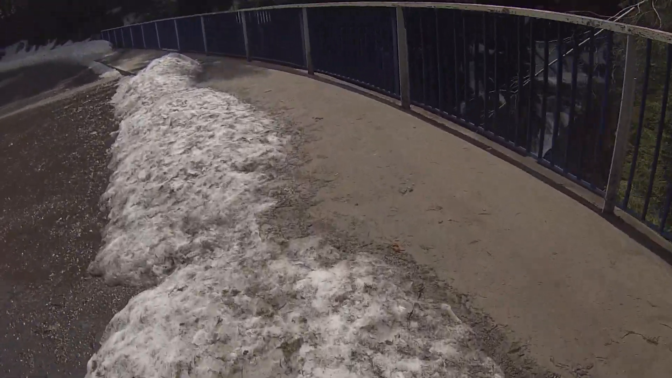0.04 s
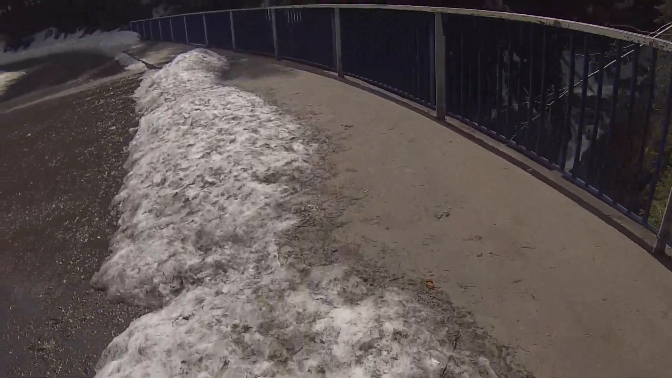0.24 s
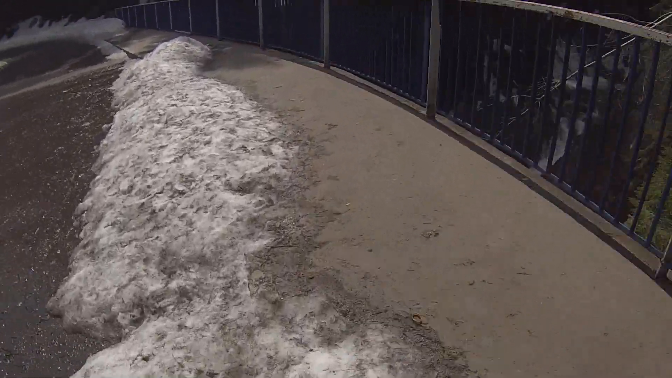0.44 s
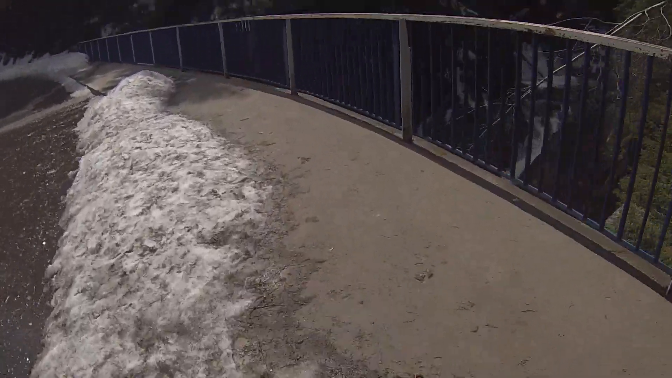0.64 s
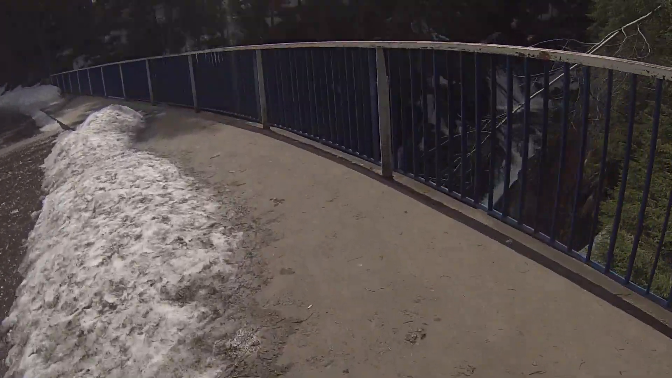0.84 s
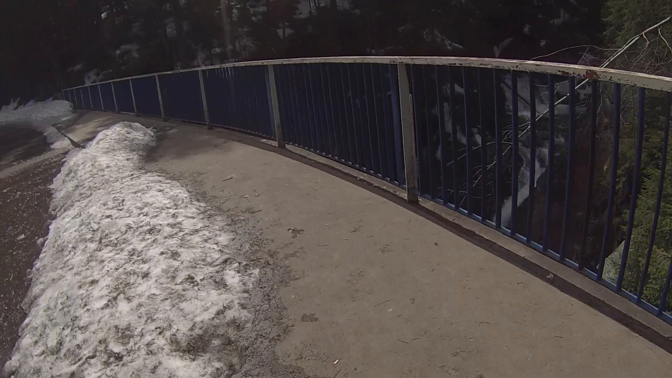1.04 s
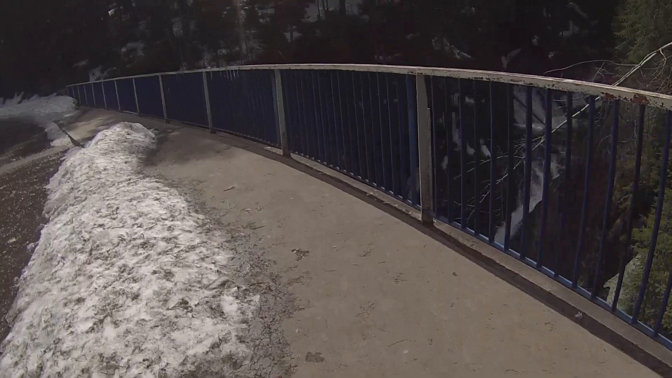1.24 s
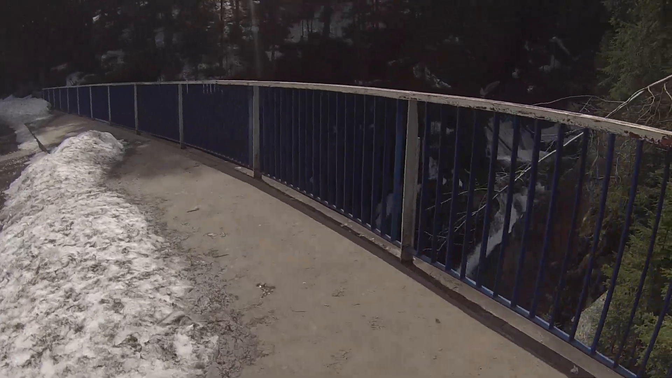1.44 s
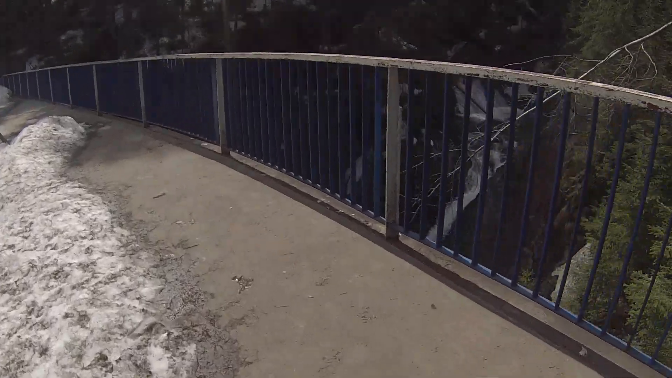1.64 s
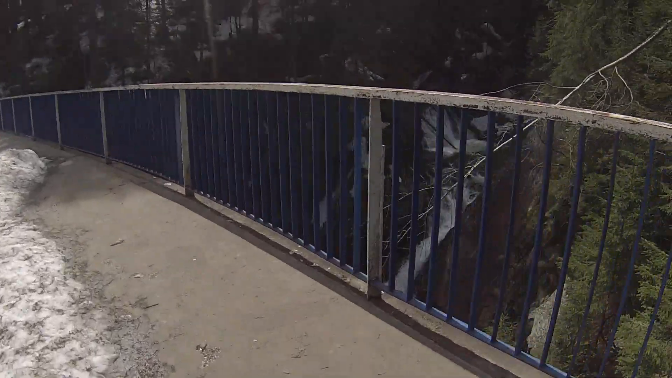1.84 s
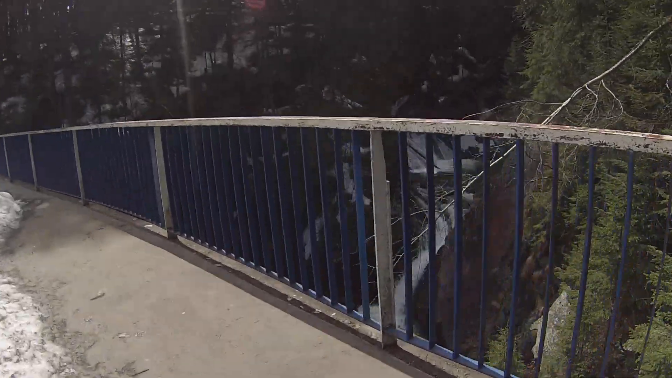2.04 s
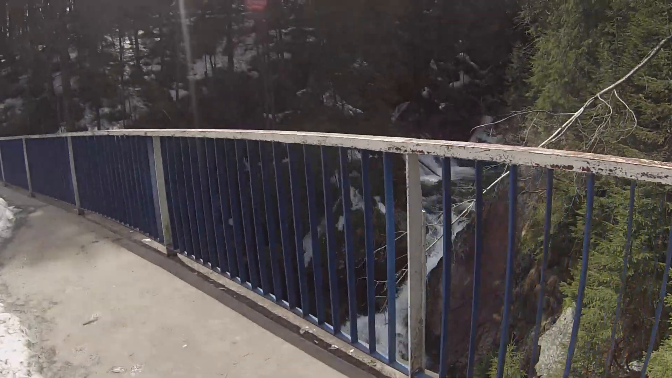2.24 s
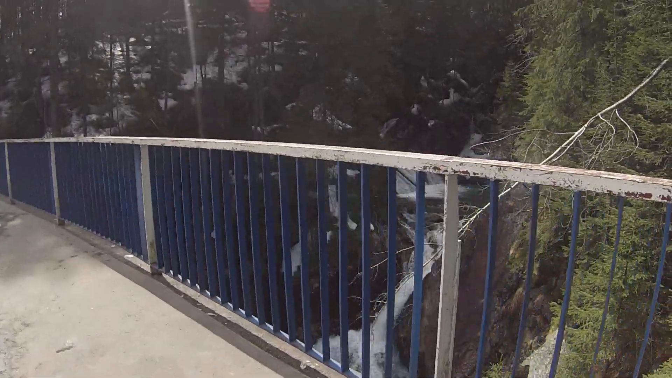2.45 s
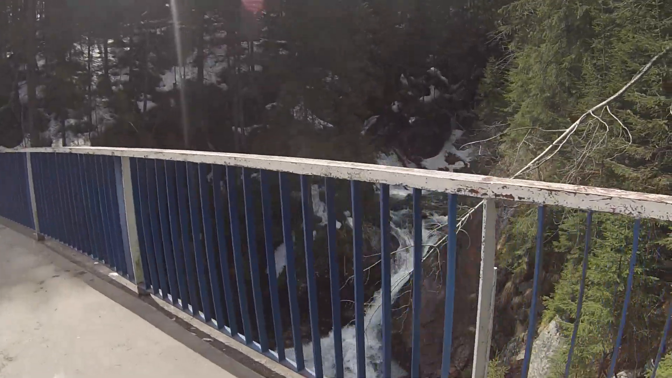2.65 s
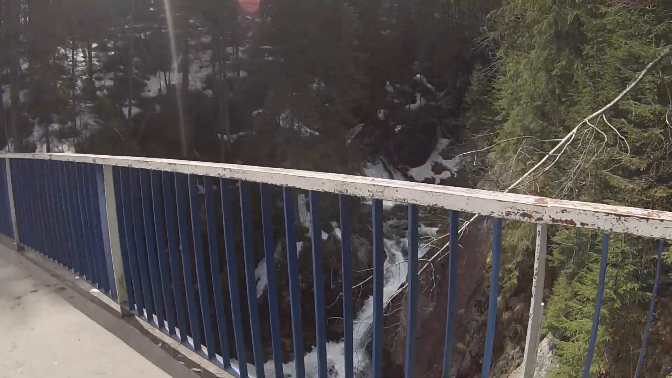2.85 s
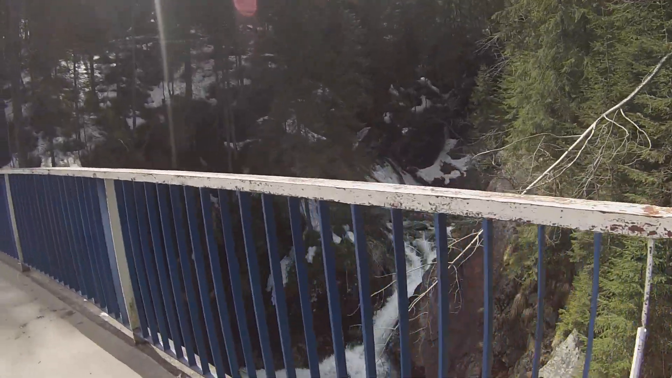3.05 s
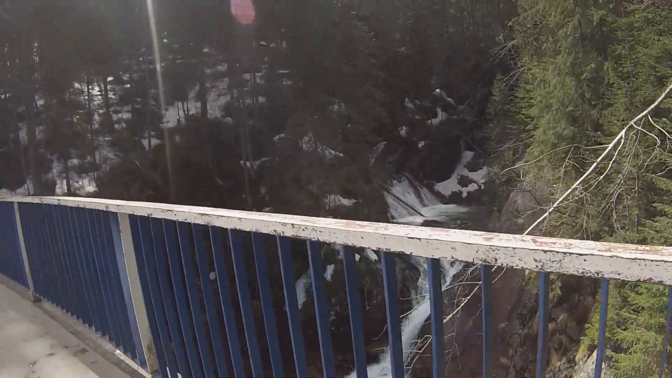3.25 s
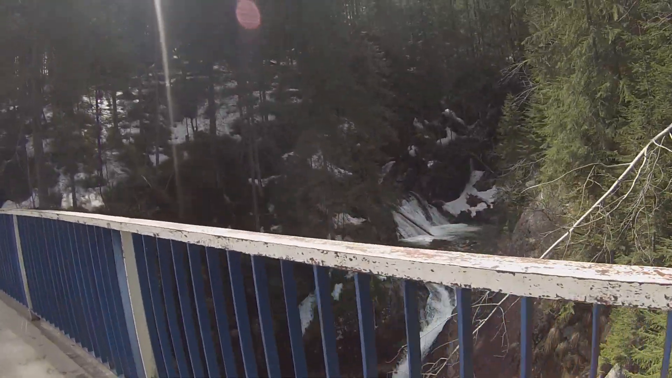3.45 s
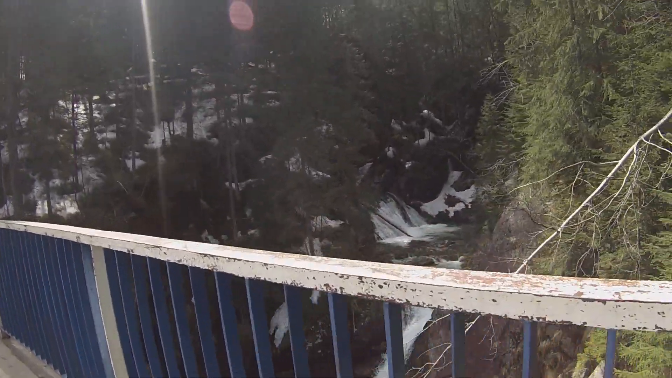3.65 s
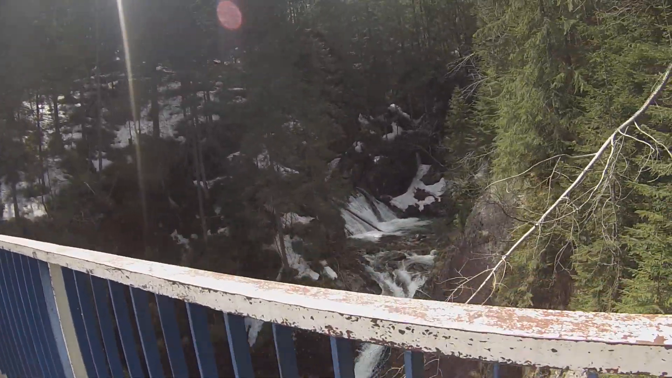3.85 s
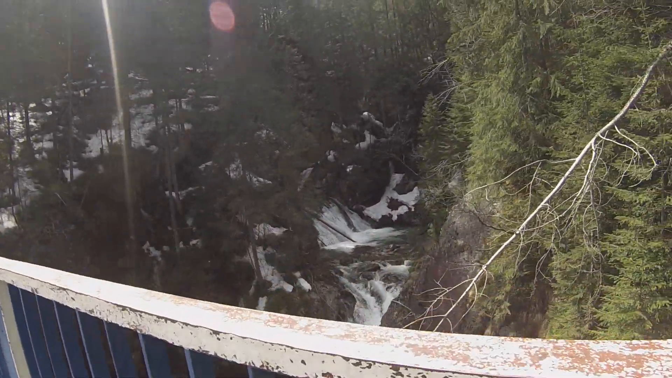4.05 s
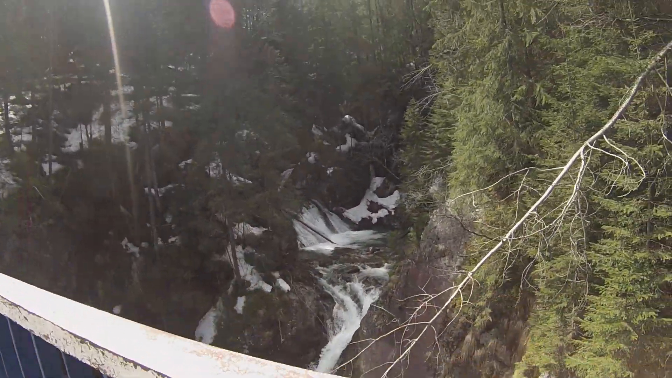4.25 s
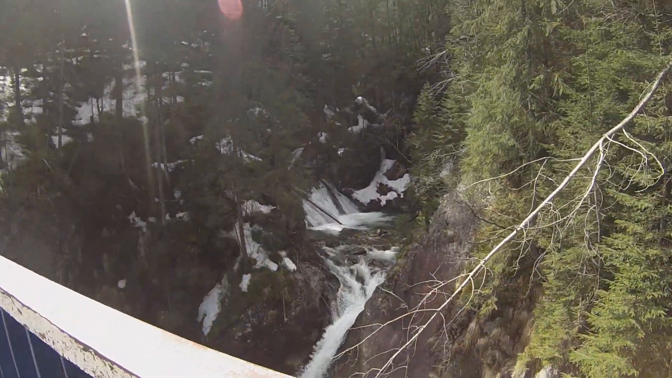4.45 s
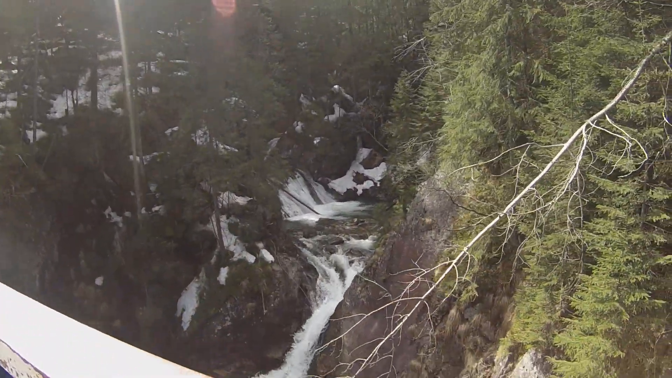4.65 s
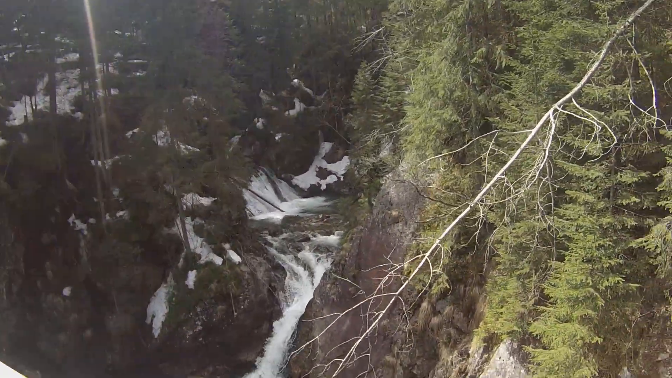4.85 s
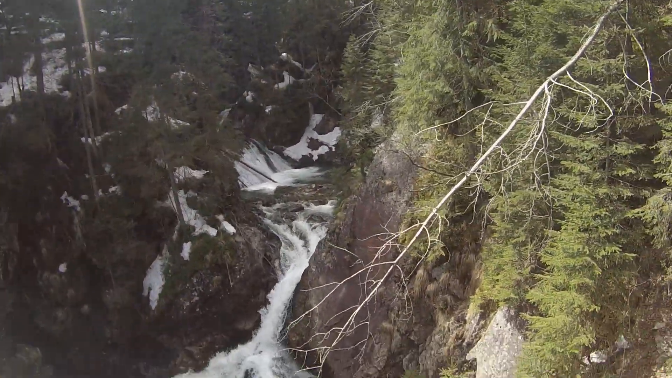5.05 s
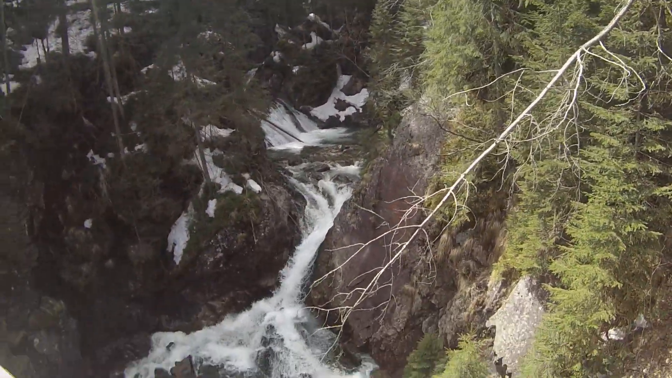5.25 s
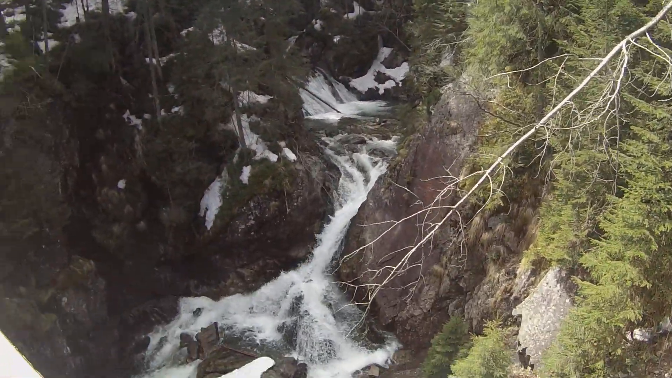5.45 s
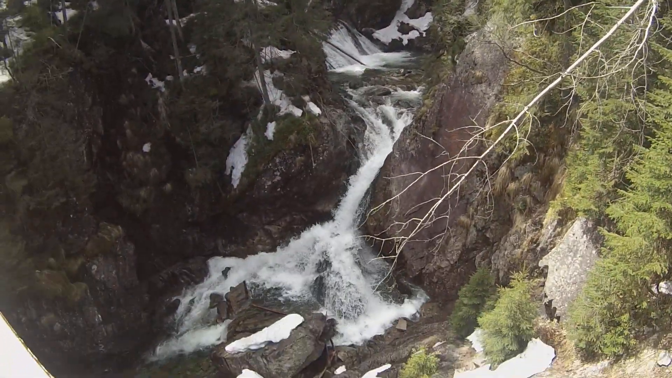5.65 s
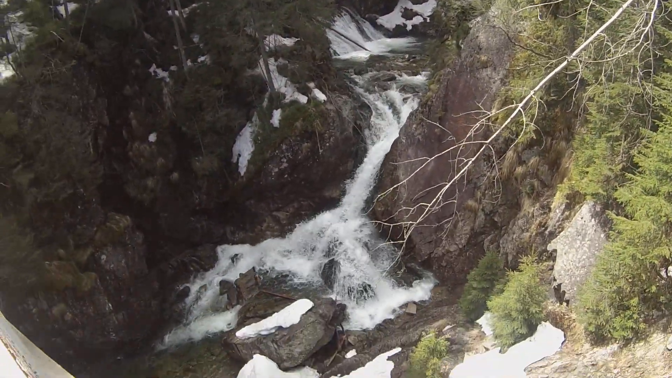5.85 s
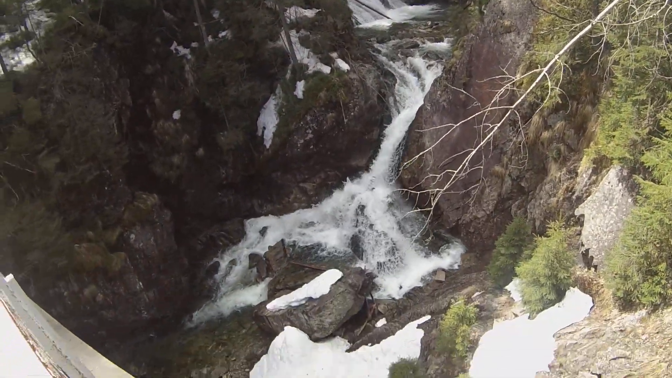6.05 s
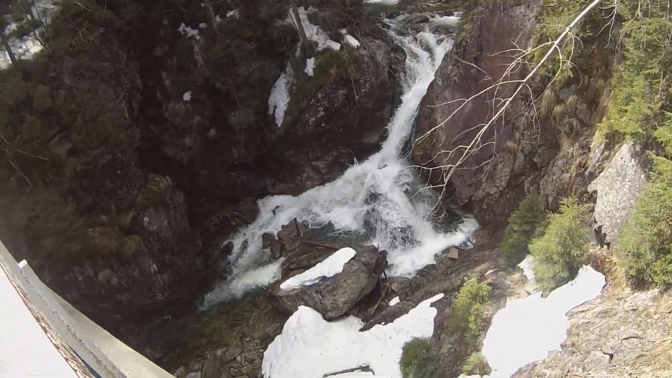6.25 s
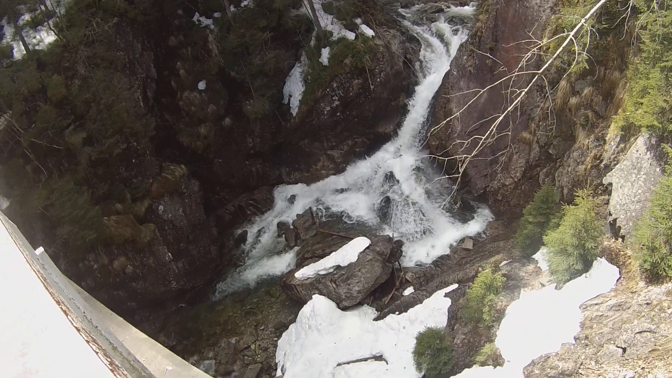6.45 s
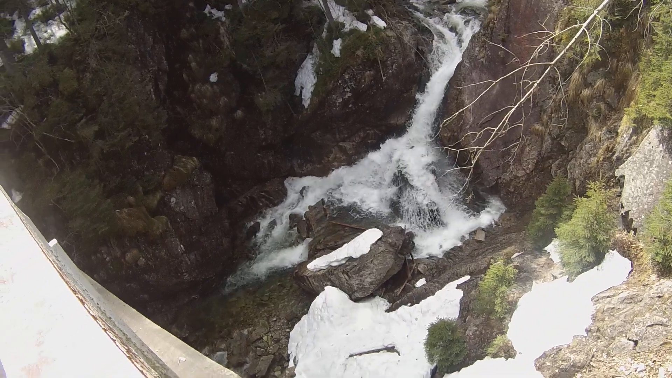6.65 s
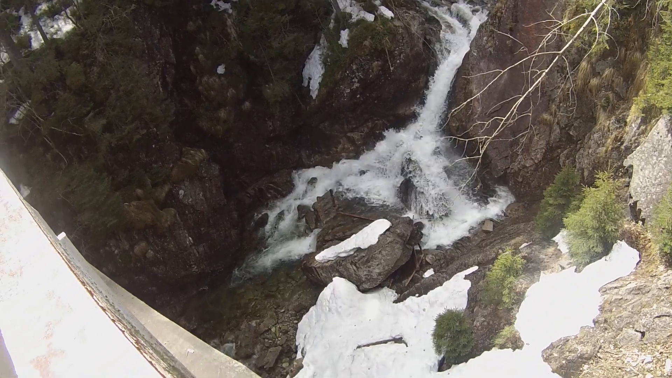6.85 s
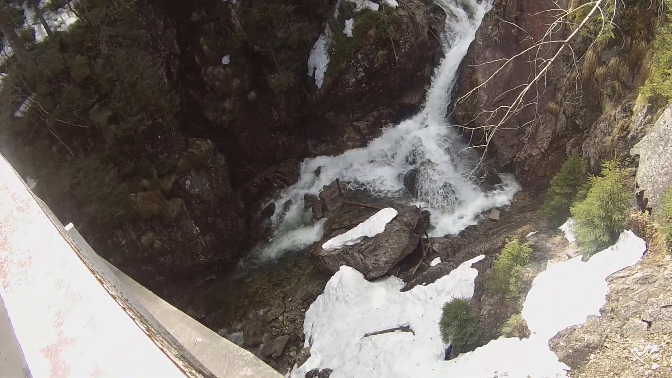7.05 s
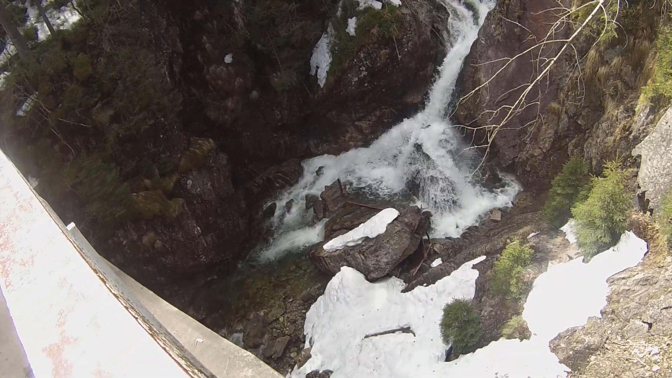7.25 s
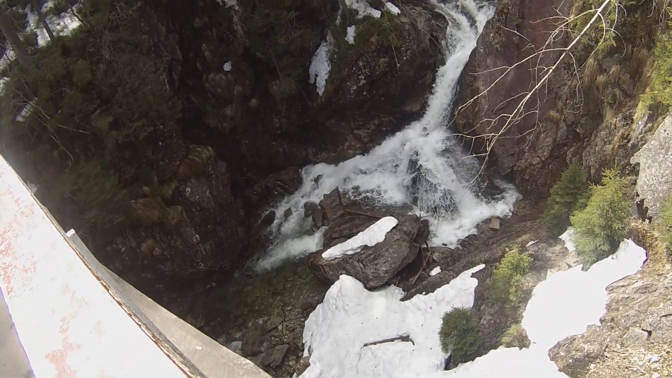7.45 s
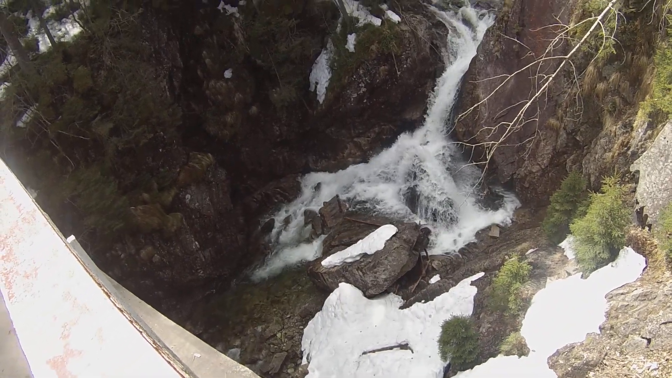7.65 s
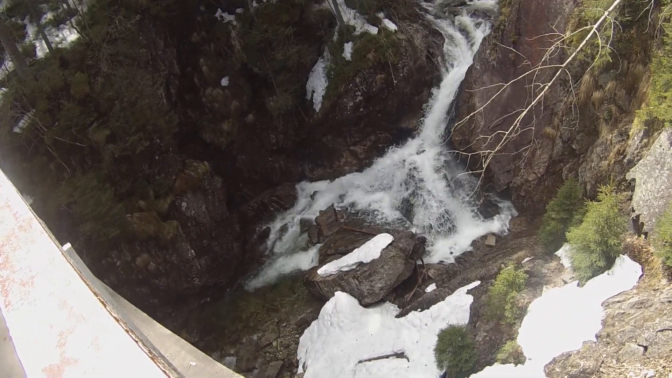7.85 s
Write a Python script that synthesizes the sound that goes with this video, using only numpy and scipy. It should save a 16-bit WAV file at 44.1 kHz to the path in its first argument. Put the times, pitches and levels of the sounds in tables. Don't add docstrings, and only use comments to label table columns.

```python
import sys
import numpy as np
from scipy import signal
from scipy.fft import rfft, irfft, next_fast_len
from scipy.io import wavfile
from scipy.ndimage import uniform_filter1d, map_coordinates

SR = 44100
rng = np.random.default_rng(int(sys.argv[2]) if len(sys.argv) > 2 else 0)


def linear_from_db(decibels):
    return 10 ** (np.asarray(decibels, float) / 20)


def dump(signal):
    limited = np.clip(np.atleast_2d(signal).T, -1, 1)
    pcm = np.round(limited * 32767).astype(np.int16)
    wavfile.write(sys.argv[1], SR, pcm)


N = 348390

# time in seconds, pose (0 behind the deck, 1 turning at the rail,
# 2 facing the fall), gain by nearness in dB.
WALK_TO_RAIL = [(0, 0.081, 0), (.94, 0.1, 1.5), (1.5, 0.081, 2), (2.1, .3, 2.5), (2.8, 0.51, 3.5),
                (3.43, 0.47, 4.5), (3.7, 1.24, 5), (4.3, 1.37, 4.5), (4.8, 1.4, 5), (5.3, 1.77, 5.5),
                (5.6, 1.78, 5.5), (6.5, 1.95, 5.5), (7.9, 1.86, 5.5)]
# frequency in Hz, density in dB per Hz.
ROAR_SPECTRUM = [(60, -1), (150, -2.5), (300, -2), (450, -6), (650, -14), (1000, -54), (3000, -120)]
RUSH_SPECTRUM = [(100, -120), (500, -16), (750, -7), (1200, -1.5), (2500, 0.5), (3600, -1.5), (4200, -5),
                 (4850, -17.5), (6000, -43), (12000, -120)]
SPRAY_SPECTRUM = [(1500, -120), (4000, -28), (4900, -4), (5500, -2), (7300, -6), (9500, -8), (13000, -16.5),
                  (15000, -21), (15250, -30), (15400, -120)]
# centre in Hz, width in Hz,
# gain behind the deck in dB, gain turning in dB, gain facing the fall in dB.
HOUSING_RESONANCES = [(900, 336, 6.5, 6, 5), (1306, 320, 2.5, 6.5, -2), (1558, 133, 7, 0.5, 7),
                      (1780, 160, 1, -2, -2), (2020, 350, -2.5, -7.5, 3), (2395, 640, -1.5, 8.5, 1.5),
                      (2863, 117, 2.5, 2, 6), (3020, 115, -0.5, 8, -1), (3373, 420, 6, 3, 12.5),
                      (3780, 260, -2, -3, 3), (4220, 110, -4, -9, 7), (4513, 400, 5.5, 15, 5),
                      (4870, 150, -6, -3, -8), (5300, 450, 3.5, 5.5, 6)]
PORT_RESONANCES = [(7600, 350, -1, 2, -5.5), (6280, 710, 2.5, 3.5, 5.5), (8440, 1580, 5, 1, 9.5),
                   (9700, 1500, -0.5, -3, -0.5), (12000, 650, 1, 5, 4)]
# frequency in Hz, density in dB per Hz.
SWAY_SPECTRUM = [(2, -10), (8, 5), (18, 4), (30, -4.5), (45, -16), (80, -63), (300, -120)]
SHUDDER_SPECTRUM = [(5, -120), (20, -3), (33, 0), (55, -4.5), (80, -13.5), (110, -26), (200, -28.5),
                    (1000, -120)]
# time in seconds, sway level in dB.
ARM_UNREST = [(0, -52.5), (.7, -53.5), (1.2, -46), (1.8, -45.5), (2.3, -50.5), (2.8, -48.5), (3.3, -50),
              (3.9, -51.5), (4.4, -49.5), (5.15, -44.5), (5.85, -45.5), (6.3, -53), (6.7, -51.5),
              (7.9, -55.5)]
# centre in seconds, sway level in dB,
# shudder against sway in dB, length in seconds.
ARM_JOLTS = [(0.163, -52, 7, .12), (0.302, -48, -3, 0.13), (0.409, -37.5, -16, 0.093),
             (0.55, -40, -8.5, 0.29), (0.81, -46, -5, 0.12), (0.955, -42, -16, 0.34), (1.354, -60, 7, 0.13),
             (1.5, -39, -21, .12), (1.618, -28.5, -29, 0.21), (1.933, -41, -11, 0.076),
             (2.07, -39, -33, 0.32), (2.42, -43, -4, 0.075), (2.554, -35, -20, 0.19), (2.74, -46, -1, .14),
             (3.076, -37, -27, 0.062), (3.19, -44, -22, 0.086), (3.61, -46, -10, 0.11),
             (4.09, -41, -8, 0.07), (4.192, -39.5, -24, 0.2), (4.472, -43.5, -4, 0.093),
             (4.652, -63, 16, 0.1), (4.82, -33.5, -16, 0.21), (4.95, -40, 2, 0.084), (5.037, -48, 6, 0.066),
             (5.33, -48, 7, 0.13), (5.465, -47, -10, .18), (5.605, -64, 13, 0.096), (5.73, -42, -9, 0.071),
             (6.124, -43, -4, 0.24), (7.124, -57, 3, 0.088)]
# start in seconds, peak in dB, direction (sign), length in seconds.
SOFT_PUSHES = [(2.731, -31, 1, 0.0015), (0.162, -47, -1, 0.016), (0.584, -28, 1, 0.033),
               (0.597, -28.5, -1, 0.023), (3.634, -35.5, 1, 0.0059), (5.01, -30, 1, 0.0039),
               (6.078, -25.5, -1, 0.0197), (4.2, -32, -1, 0.0052), (4.298, -30, -1, 0.0033),
               (4.41, -36, 1, 0.0029), (4.596, -29, -1, 0.0025), (4.699, -26.5, -1, 0.0045),
               (4.765, -28.5, -1, 0.003), (4.791, -36.5, -1, 0.0029), (5.115, -29.5, 1, 0.0043),
               (5.262, -38, 1, 0.0036), (5.608, -34, -1, 0.0042), (5.72, -35, -1, 0.0024),
               (5.784, -30.5, -1, 0.0049), (5.951, -32.5, 1, 0.0031), (6.336, -26.5, 1, 0.0037),
               (6.388, -36, 1, 0.01), (6.496, -35.5, 1, 0.0076)]
# frequency in Hz, level in dB, decay time t60 in seconds.
SHELL_MODES = [(580, -15, 0.015), (830, 4, 0.029), (1100, 7, 0.0089), (1530, 4, 0.016), (1880, -12, 0.052),
               (2190, 3, 0.015), (2650, -39, 0.015), (3020, 11, 0.017), (4600, -1, 0.011),
               (5670, 14, 0.0056), (8130, 10, 0.0063), (9300, 5, 0.005), (11700, 4, 0.0041),
               (14500, -2, 0.0033)]
# start in seconds, peak in dB, centre of the blow in Hz.
LIGHT_TICKS = [(4.142, -41.5, 1010), (4.403, -34, 1110), (4.5959, -32, 1090), (4.635, -28.5, 1290),
               (4.698, -26, 1110), (4.723, -34, 900), (4.765, -45, 1200), (4.931, -35.5, 890),
               (4.955, -27, 2200), (4.968, -30.5, 1190), (4.988, -32, 1200), (5.068, -38, 2500),
               (5.117, -38.5, 800), (5.261, -40, 1000), (5.72, -42, 806), (6.336, -40, 800)]
# start in seconds, peak in dB, centre in Hz,
# fall-off in dB per octave, ring against the blow in dB.
HARD_SNAPS = [
    (2.732, -5.5, 1600, 0, -18.5),
    (4.667, -14, 1600, 10, -9),
    (4.6674, -25.5, 2800, 19, -7),
    (5.0128, -19.5, 750, 17, -6),
]
# start in seconds, peak in dB, frequency in Hz, ring length factor.
LOOSE_PINGS = [
    (0.527, -51, 3150, 1.2),
    (.526, -55, 1900, 1.2),
    (2.737, -49, 1880, 2.2),
    (5.013, -37, 2650, 0.74),
]
# start in seconds, length in seconds, level in dB,
# centre in Hz, fade over the stroke in dB.
RUB_STROKES = [
    (1.437, 0.13, -68, 9000, -4),
    (3.611, 0.16, -53.5, 1700, -1.5),
    (4.691, 0.17, -42.5, 1300, -9.5),
    (4.928, 0.08, -40.5, 1440, -4),
    (5.015, 0.044, -40, 850, -8),
    (5.319, 0.042, -51, 1000, -4),
    (5.42, .2, -49.5, 1500, -5.5),
    (4.935, .06, -57, 7000, 3),
    (5.418, .3, -68, 11000, -2),
    (5.72, .14, -65, 12000, -2),
]
# frequency in Hz, gain in dB.
MICROPHONE_BAND = [(1, 0), (15100, 0), (15500, -120)]


def unit(x):
    return x / np.sqrt(np.mean(x ** 2) + 1e-20)


def along(points, hz):
    f, v = np.transpose(points)
    return np.interp(np.log(hz + 1), np.log(f + 1), v)


def curves(rows):
    s, *columns = np.transpose(rows)
    return [np.interp(np.arange(N) / SR, s, column) for column in columns]


def wobble(rate, count=N):
    knots = rng.standard_normal(int(count * rate / SR) + 4)
    return map_coordinates(knots, [np.arange(count) * rate / SR], order=1)


def noise(spectrum, source=None):
    source = rng.standard_normal(N) if source is None else source
    size = next_fast_len(len(source) + 8192)
    gain = linear_from_db(along(spectrum, np.fft.rfftfreq(size, 1 / SR)))
    return unit(irfft(rfft(source, size) * gain, size)[:len(source)])


def steady(x, span):
    width = int(span * SR)
    power = uniform_filter1d(uniform_filter1d(x ** 2, width), width)
    return unit(x / np.sqrt(np.abs(power) + 0.13))


def add(track, s, sound):
    part = track[round(s * SR):][:len(sound)]
    part += sound[:len(part)]


def waterfall():
    pose, near_db = curves(WALK_TO_RAIL)
    surge_db = 0.092 * wobble(3.35) + 0.5 * wobble(11)
    drops = rng.standard_normal(N) * linear_from_db(0.7 * wobble(300))
    roar_db = -62 + 0.61 * near_db + 2 * pose + 0.3 * wobble(9.4)
    rush_db = -59.5 + near_db + surge_db
    spray_db = -69.5 + 1.774 * near_db - 0.16 * pose + surge_db
    roar = linear_from_db(roar_db) * noise(ROAR_SPECTRUM)
    rush = linear_from_db(rush_db) * noise(RUSH_SPECTRUM, drops)
    spray = linear_from_db(spray_db) * noise(SPRAY_SPECTRUM, drops)
    return housing(roar + rush + spray, patchy_db=0.68)


def housing(x, patchy_db):
    hz, t, z = signal.stft(x, SR, nperseg=1024)
    pose = np.clip(np.interp(t, *np.transpose(WALK_TO_RAIL)[:2]), 0, 2)
    gain_db = 0
    for centre_hz, width_hz, *levels_db in HOUSING_RESONANCES + PORT_RESONANCES:
        peak = 1 / (1 + (2 * (hz[:, None] - centre_hz) / width_hz) ** 2)
        gain_db = gain_db + np.interp(pose, [0, 1, 2], levels_db) * peak
    patches = uniform_filter1d(rng.standard_normal(z.shape), size=12, axis=0)
    patches = unit(uniform_filter1d(patches, size=6, axis=1))
    return signal.istft(z * linear_from_db(gain_db + patchy_db * patches), SR, nperseg=1024)[1][:N]


def shake():
    idle_shudder_db = -2.5
    arm_db, = curves(ARM_UNREST)
    sway, shudder = linear_from_db(arm_db), linear_from_db(arm_db + idle_shudder_db)
    for s, db, sharp_db, length in ARM_JOLTS:
        swell = np.hanning(round(length * SR))
        add(sway, s - length / 2, linear_from_db(db) * swell)
        add(shudder, s - length / 2, linear_from_db(db + sharp_db) * swell)
    slow = sway * steady(noise(SWAY_SPECTRUM), 0.082)
    quick = shudder * steady(noise(SHUDDER_SPECTRUM), 0.011)
    return slow + quick


def thumps():
    out = np.zeros(N)
    for s, db, direction, length in SOFT_PUSHES:
        u = np.arange(SR // 8) / SR / length
        push = np.sin(np.pi * np.minimum(u, 1)) ** 2
        rebound = 0.3 * np.sin(np.pi * np.clip((u - 0.8) / 1.57, 0, 1)) ** 2
        add(out, s, np.sign(direction) * linear_from_db(db) * (push - rebound))
    return out


def blows():
    ticks = [(s, db, hz, 4, 0.57, -14) for s, db, hz in LIGHT_TICKS]
    snaps = [(s, db, hz, fall_db, 0.77 * (1600 / hz) ** 0.28, ring_db)
             for s, db, hz, fall_db, ring_db in HARD_SNAPS]
    pinged = [(s, db, hz, 30, ring, -14) for s, db, hz, ring in LOOSE_PINGS]
    return ticks + snaps + pinged


def clicks():
    ring_lag, lag_luck = 0.5, 0.2
    size_luck_db = 0.8
    out, t = np.zeros(N), np.arange(SR // 10) / SR
    hz, level_db, t60 = np.transpose(SHELL_MODES)[..., None]
    for s, db, centre_hz, fall_db, ring, ring_db in blows():
        luck = rng.standard_normal(len(SHELL_MODES))
        cycles = t * centre_hz
        blow = np.sin(2 * np.pi * cycles) * np.sin(np.pi * np.clip(cycles / 1.68, 0, 1)) ** 1.58

        octaves_off = np.abs(np.log2(hz / centre_hz))
        size_db = ring_db + level_db - fall_db * octaves_off + size_luck_db * luck[:, None]
        phase = 2 * np.pi * hz * t - ring_lag + lag_luck * luck[::-1, None]
        bell = (linear_from_db(size_db - 60 * t / (t60 * ring)) * np.sin(phase)).sum(0)

        band = signal.butter(2, [centre_hz * 0.45, centre_hz * 2.2], "bandpass", fs=SR, output="sos")
        grains = unit(signal.sosfilt(band, rng.standard_normal(len(t))))
        rattle = linear_from_db(-26.5 - 60 * t / (0.061 * ring)) * grains

        onset = 1 - np.exp(-t / 0.00029)
        thin = signal.butter(3, centre_hz * 0.36, "highpass", fs=SR, output="sos")
        add(out, s, linear_from_db(db) * signal.sosfilt(thin, blow + (bell + rattle) * onset))
    return out


def pings():
    out, t = np.zeros(N), np.arange(SR // 10) / SR
    for s, db, hz, ring in LOOSE_PINGS:
        decay = linear_from_db(db + 9.5 - 60 * t / (0.033 * ring))
        onset = 1 - np.exp(-t / 0.0015)
        add(out, s, decay * np.sin(2 * np.pi * hz * t) * onset)
    return out


def rubs():
    out, longest = np.zeros(N), SR // 2
    for s, length, db, centre_hz, fade_db in RUB_STROKES:
        grit_db = 4.2 + 0.12 * (db + 42)
        catches = wobble(497.0, count=longest) + 0.17 * wobble(73, count=longest)
        grit = rng.standard_normal(longest) * linear_from_db(grit_db * catches)
        colour = [(centre_hz / 30, -120), (centre_hz / 5, -20), (centre_hz / 2, -3),
                  (centre_hz, 0), (centre_hz * 2.56, -10), (centre_hz * 8, -36)]
        scratch = noise(colour, noise(MICROPHONE_BAND, grit))[:round(length * SR)]
        fade = linear_from_db(db + np.linspace(0, fade_db, len(scratch)))
        add(out, s, fade * signal.windows.tukey(len(scratch), 0.4) * scratch)
    return out


def scene():
    water = waterfall()
    handling = shake() + thumps() + clicks() + pings() + rubs()
    capsule = signal.butter(12, 15100, fs=SR, output="sos")
    return (water + signal.sosfilt(capsule, handling))[None]


def top_cut(x):
    return signal.sosfilt(signal.butter(12, 16550, fs=SR, output="sos"), x)


def record(dry):
    return top_cut(dry)


dry = scene()
out = record(dry)
dump(out)
```